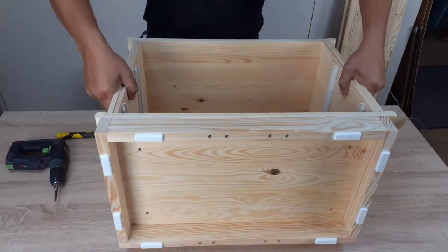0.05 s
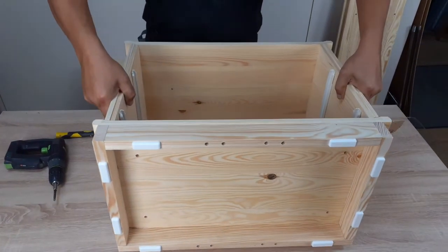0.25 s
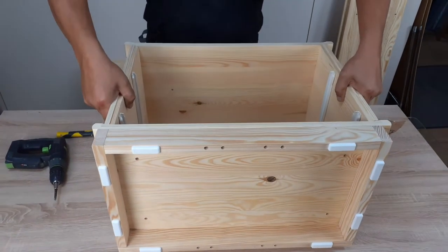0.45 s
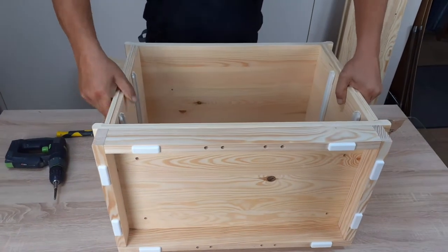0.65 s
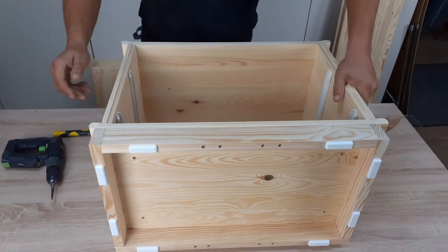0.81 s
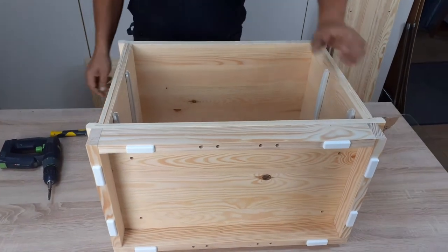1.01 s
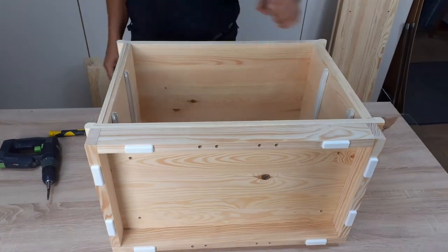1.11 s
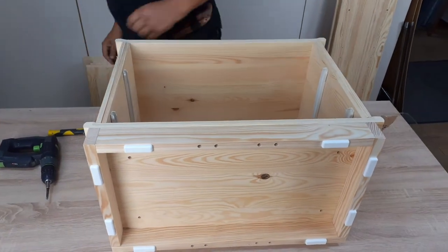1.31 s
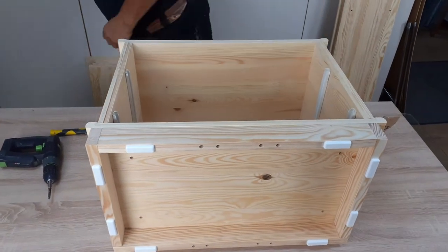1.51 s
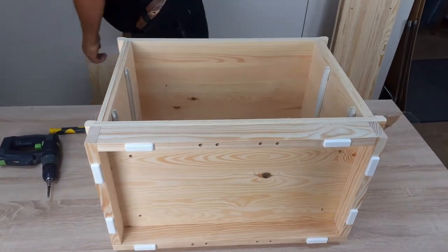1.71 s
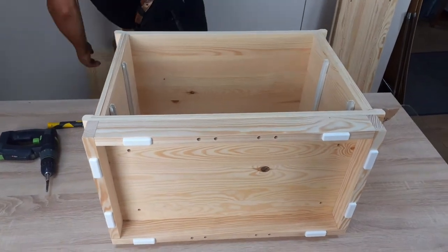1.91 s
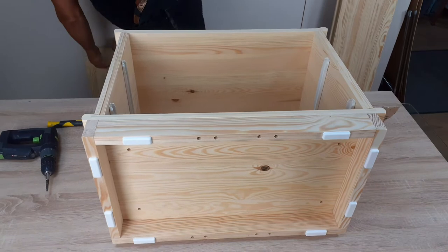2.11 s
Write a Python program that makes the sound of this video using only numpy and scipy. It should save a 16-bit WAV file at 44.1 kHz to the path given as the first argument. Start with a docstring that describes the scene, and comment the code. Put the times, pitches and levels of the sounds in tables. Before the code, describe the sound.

A hollow wooden cabinet lands on a table with clattering double knocks, then faint scrapes and bumps

```python
"""A pine cabinet is tipped onto a table in a small workshop, in still, faintly wavering air.
Hands brush the wood, as swelling and fading noise of tiny slips, from the start and well past the landing.
One edge lands and judders, then the other, and the box rocks to rest: blows ring modes and rattle boards.
Soft bumps knock behind the table now and then; late on something there, likely a loose board, scrapes twice
as filtered slip noise and settles with a low bump, a short force ringing a few decaying modes."""
import sys
import numpy as np
from scipy import signal
from scipy.fft import rfft, irfft
from scipy.io import wavfile

SR = 44100
rng = np.random.default_rng(int(sys.argv[2]) if len(sys.argv) > 2 else 0)


def generate_wav(sig):
    """Save sig (samples, or channels by samples) to the path in sys.argv[1] as 16-bit PCM at SR."""
    pcm = np.round(np.clip(np.atleast_2d(sig).T, -1, 1) * 32767).astype(np.int16)
    wavfile.write(sys.argv[1], SR, pcm)


N = 94815
FFT_SIZE = 131072

# All table levels are relative; the gains below and the colour of the ports act on top of them.
# Blows of the cabinet on the table: t/s, place (0 first edge, 1 second edge), boom level/dB,
# contact/ms (force peaks after a quarter of it), clack level/dB, clack tilt/(dB/octave), struck board f/Hz
BLOWS = [(0.2029, 0.0, -33.5, 0.61, -30, -2.5, 1300), (0.213, 0, -20.5, 1.67, -27.5, -6, 1300),
         (0.2173, 0.089, -13.5, 0.79, 1, -4.5, 1250), (0.2466, 0, -24, 1.1, -11.5, -14, 900),
         (0.273, 0.47, -14.5, 1.3, -12.5, -9.5, 1550), (0.375, 0.76, -7.5, 1.08, -0.5, 2, 1650),
         (0.3805, 0.99, 1.1, 2.03, 2.5, -1.5, 1200), (0.3992, 1.0, -9.5, 2, -3.5, 2, 1000),
         (0.4065, 0.37, -4, 2.8, -6.5, 0.5, 1000), (0.4509, 0.51, -9, 2.3, -6.5, -1, 1350),
         (0.458, 0.17, -5, 1.86, -13, 1.5, 1400), (0.4832, 0.95, -7, 3.6, -4, 2, 2110),
         (0.503, 0.96, -22.5, 1.6, -13, 0, 2300), (0.5498, 0.66, -14, 2.07, -22.5, -10, 904),
         (0.607, 0.0, -21, 0.97, -11, 0.5, 1100)]
# Modes of the box on the table: f/Hz, level/dB from the first edge, level/dB from the second edge, t60/s
BOX_MODES = [(74.6, -33, -17.5, 0.25), (118.5, -22.5, -13.5, 0.27), (125.07, -8, 4, 0.46),
             (167, 3.9, -9.5, 0.4), (209.6, -6.5, -3.5, 0.29), (256.0, -4.5, -29.5, 0.32),
             (285.9, -31.5, 2.24, 0.4), (317.98, 5.5, -17, 0.44), (347, -23, -11.5, 0.18),
             (371.6, -25.5, -15.5, 0.51), (429.4, -33, -22.5, 0.25), (525, -18, -30, 0.28),
             (650, -21, -36.5, 0.4), (848, -18.5, -31, 0.4)]
# Standing waves of the room: f/Hz, level/dB, t60/s
STANDING_WAVES = [(143, -36, 1.5), (308, -24, .7)]
# Colour of the dense upper modes of the boards: f/Hz, level/dB
CLACK_COLOUR = [(60, -18), (140, 2), (330, 7.5), (480, -10), (700, -4), (1100, -2.5), (1750, -11.5),
                (2300, -13.5), (3000, -28.5), (3600, -25), (4500, -31), (7000, -39), (15000, -48.5)]
# Strongest resonances of the boards: f/Hz, lift level/dB
BOARD_PEAKS = [(635, 0), (978, 5.5), (1077, 1), (1125, 4), (1255, 3.5), (1415, 8.5)]
# Colour of the juddering edge: f/Hz, level/dB
SKID_COLOUR = [(200, -23.5), (450, -5.5), (625, 7.5), (750, 3.5), (1200, -9.5), (1600, -4), (2000, -23),
               (5000, -39.5)]
# Hands and sleeves on the wood: t/s, attack/s, hold/s, release t60/s, level/dB, tilt/(dB/octave),
# pan/dB (left over right)
RUBS = [(0.0, 0.0013, 0.016, .25, -69.5, -6.5, -1.5), (0.174, 0.029, 0.012, 0.59, -54, -3, -1),
        (0.38, 0.0191, 0.06, 0.91, -53.5, -4, -0.5), (0.566, 0.0054, 0.04, 0.18, -63.5, 0.5, -0.5),
        (0.605, 0.00055, 0.0043, 0.16, -58.5, 6, -4), (0.61, 0.039, 0.03, 0.36, -57.5, 0, -1),
        (0.852, 0.019, 0.031, 0.71, -70.5, -0.2, 0.5), (1.13, 0.093, 0.014, 0.43, -71, -0.5, -2.5),
        (1.227, 0.027, 0.062, 0.49, -61.5, -1.5, 0), (1.326, 0.053, 0.079, 0.24, -67, -1.5, -1),
        (1.436, 0.045, 0.022, 1, -57.5, 0, 1.5)]
# Colour of skin and cloth on wood: f/Hz, level/dB
RUB_COLOUR = [(100, -33.5), (330, -8.5), (600, -6), (1500, 0.5), (2600, -3), (4000, -2), (5500, -7),
              (8000, -11), (15000, -20)]
# Wood dragged over wood: t/s, attack/s, hold/s, release t60/s, level/dB, body f/Hz, body lift level/dB,
# bass cut f/Hz, pan/dB (left over right)
SCRAPES = [(1.491, 0.072, 0.091, 0.63, -47.5, 1286, 4.5, 443, -1),
           (1.753, 0.074, 0.044, 0.45, -41.5, 756, 4.5, 119, 0.5)]
# Colour of wood on wood: f/Hz, level/dB
SCRAPE_COLOUR = [(60, -13), (160, -4.5), (450, -8), (750, -1.5), (1200, -0.5), (2000, 0), (3000, -5.5),
                 (4400, -7.5), (5800, -15.5), (8000, -20.5), (15000, -34)]
# Soft bumps behind the table: t/s, level/dB, contact/ms (force peaks after a quarter of it)
BUMPS = [(0.091, -19.5, 3.1), (0.921, -19.5, 1.5), (1.311, -24.5, 0.77), (1.38, -25.5, 0.64),
         (1.808, -7, 0.32), (1.884, 15, 8.2), (1.921, 5.5, 2.16), (1.953, 2, 1.23), (1.992, -6.5, 0.66),
         (2.033, -13, 1.1), (2.116, -17, 1.74)]
# Modes the bumps ring: f/Hz, level/dB, t60/s
THUD_MODES = [(70.6, -2.5, 0.35), (128.9, -8, .18), (142, -8.5, 0.18), (227, -3, .12), (331.3, -1, .16),
              (425.2, -4.5, 0.13)]
# Colour of the still air: f/Hz, level/dB
AIR_COLOUR = [(30, -31.5), (80, -12.5), (140, -2), (220, -6), (310, 4), (600, -17), (1500, -11),
              (4000, -21.5), (8000, -23), (15000, -22)]
# Reverberation of the workshop: f/Hz, t60/s
ROOM = [(100, .45), (330, .6), (1000, .48), (3000, .45)]
# Colour of the two microphone ports: f/Hz, left level/dB, right level/dB
PORTS = [(96, 5.5, 3.5), (393, 9, 8), (1270, 0.97, -1.4), (2478, 1, -1.5), (4600, -0.5, 0), (6200, -2, 0.5),
         (8500, -11.5, 4.5), (9886, -10.5, -5.5), (11600, -2.5, 0.5), (14500, 4.5, 0.5)]

BOX_DB, BOX_ROOM_DB, RADIATES_ABOVE_HZ = -16.5, -16, 140
RESTS_S, REST_LOSS_DB_PER_S = .555, 62  # extra damping of the box from here on
CLACK_DB, CLACK_T60_S, RATTLE_PER_S = 1, 0.031, 2500
CLACK_TAIL_DB, CLACK_TAIL_T60_S = 3, 0.26
CLACK_TILT_ABOVE_HZ, BOARD_WIDTH_HZ = 1000, 20
STRUCK_LIFT_DB, STRUCK_OCTAVES = 4.5, 0.27
SKID_S, SKID_LENGTH_S, SKID_DB, SKID_ROOM_DB = .238, .085, -45, 0.5
SKID_CATCH_HZ, SKID_JITTER = 169.4, .3  # median catch rate, spread of its natural logarithm
GRAIN_PER_S, GRAIN_DB, STROKE_WAVER_DB = 9000, -2, 0.5
# Each spot of wood favours its own resonances: spacing, spread under a blow, spread under a stroke
SPOT_SPACING_HZ, BLOW_SPOT_DB, STROKE_SPOT_DB = 50, 3, 2
SCRAPE_BODY_OCTAVES = 0.18
THUD_DB, THUD_ROOM_DB = -44.5, -9
AIR_DB, AIR_WAVER_DB = -75, .7
ROOM_BUILD_S, ALIKE_HZ = 0.0037, 560
PORT_LAG_S, TOP_HZ = .0001, 15700


def boom(room):
    """The hollow box rings in a mix of modes set by the place of each blow; standing waves outlast it."""
    forces = np.array([undb(db) * push(start, contact_ms) for start, _, db, contact_ms, *_ in BLOWS])
    place = np.clip([row[1] for row in BLOWS], 0, 1)
    first_edge = ring((1 - place) @ forces, [(hz, db, t60) for hz, db, _, t60 in BOX_MODES])
    second_edge = ring(place @ forces, [(hz, db, t60) for hz, _, db, t60 in BOX_MODES])
    resting_s = np.maximum(np.arange(N) / SR - RESTS_S, 0)
    box = (first_edge + second_edge) * undb(-REST_LOSS_DB_PER_S * resting_s)
    standing = ring(forces.sum(0), STANDING_WAVES)
    return undb(BOX_DB) * heard(box + standing, room, BOX_ROOM_DB)


def clack():
    """Each blow rattles the boards briefly, as random contacts, and leaves a diffuse tail in the room."""
    t, out = np.arange(N) / SR, 0
    peaks = sum(db / (1 + ((freqs() - hz) / BOARD_WIDTH_HZ) ** 2) for hz, db in BOARD_PEAKS)
    boards = curve(CLACK_COLOUR) + peaks
    for start, _, _, _, db, slope, ring_hz in BLOWS:
        since = t - start
        rattle = unit(slips(RATTLE_PER_S)[0] * (since >= 0) * fade(since, CLACK_T60_S))
        tail_shape = np.clip(since / ROOM_BUILD_S, 0, 1) * fade(since, CLACK_TAIL_T60_S)
        tail = unit(diffuse(rng.standard_normal((2, N))) * tail_shape)
        treble = tilt(slope) * (freqs() > CLACK_TILT_ABOVE_HZ)
        struck = STRUCK_LIFT_DB * hump(ring_hz, STRUCK_OCTAVES)
        spectrum_db = boards + treble + struck + spot(BLOW_SPOT_DB)
        out = out + undb(db) * colour(rattle + undb(CLACK_TAIL_DB) * tail, spectrum_db)
    return undb(CLACK_DB) * out / np.sqrt(2 * N)


def skid(room):
    """The first edge judders over the table while the box tips: uneven catches clatter in the boards."""
    u = (np.arange(N) / SR - SKID_S) / SKID_LENGTH_S
    catch_rate = SKID_CATCH_HZ * np.exp(SKID_JITTER * waver(count=400))
    turns = np.floor(np.cumsum(catch_rate) / SR)
    swell = np.sqrt(np.clip(4 * u * (1 - u), 0, 1))
    catches = np.diff(turns, prepend=0) * swell  # one click per completed turn
    clatter = unit(colour(catches, curve(SKID_COLOUR))) * np.sqrt(SKID_LENGTH_S * SR / N)
    return undb(SKID_DB) * heard(clatter, room, SKID_ROOM_DB)


def hands():
    """Skin and cloth brush over the planed pine: friction noise tilted stroke by stroke."""
    return sum(undb(db) * friction(start, attack, hold, release, curve(RUB_COLOUR) + tilt(slope), pan)
               for start, attack, hold, release, db, slope, pan in RUBS)


def scrapes():
    """Two wooden scrapes: friction noise with a broad body resonance and a bass cut."""
    out = 0
    for start, attack, hold, release, db, body_hz, lift_db, cut_hz, pan in SCRAPES:
        body = lift_db * hump(body_hz, SCRAPE_BODY_OCTAVES)
        bass_cut = -10 * np.log10(1 + (cut_hz / np.maximum(freqs(), 20)) ** 4)
        spectrum_db = curve(SCRAPE_COLOUR) + body + bass_cut
        out = out + undb(db) * friction(start, attack, hold, release, spectrum_db, pan)
    return out


def bumps(room):
    """Dull, soft knocks behind the table: short forces ring a few decaying modes."""
    force = sum(undb(db) * push(start, contact_ms) for start, db, contact_ms in BUMPS)
    return undb(THUD_DB) * heard(ring(force, THUD_MODES), room, THUD_ROOM_DB)


def air():
    """Faint diffuse room noise that wavers slowly in level."""
    noise = unit(colour(diffuse(rng.standard_normal((2, N))), curve(AIR_COLOUR)))
    return noise * undb(AIR_DB + AIR_WAVER_DB * waver(count=20))


def workshop():
    """Response of the room: diffuse echoes that build quickly and die at a rate set by frequency."""
    t, out = np.arange(N) / SR, 0
    noise = rfft(diffuse(rng.standard_normal((2, N))), FFT_SIZE)
    for k, (_, t60) in enumerate(ROOM):
        # each band cross-fades into its neighbours
        share = curve([(row[0], j == k) for j, row in enumerate(ROOM)])
        out = out + irfft(noise * share)[:, :N] * fade(t, t60)
    return unit(out * (1 - np.exp(-t / ROOM_BUILD_S))) / np.sqrt(N)


def heard(x, room, room_db):
    """Direct sound, reaching the left port first, mixed with the room at constant power."""
    late = np.interp(np.arange(N) - round(PORT_LAG_S * SR), np.arange(N), x, left=0)
    mix = np.array([x, late]) + undb(room_db) * convolve(x, room)
    return mix / np.hypot(1, undb(room_db))


def push(start, contact_ms):
    """Force of one contact, of unit area: the longer it lasts, the duller the blow."""
    u = np.maximum(np.arange(N) / SR - start, 0) / (max(contact_ms, .1) / 4000)
    force = u * np.exp(-u)
    return force / (force.sum() + 1e-12)


def ring(force, modes):
    """Decaying sine modes driven by a force; the deep bass hardly radiates."""
    t = np.arange(N) / SR
    body = sum(undb(db) * np.sin(2 * np.pi * hz * t) * fade(t, t60) for hz, db, t60 in modes)
    radiation = signal.butter(2, RADIATES_ABOVE_HZ, "high", fs=SR, output="sos")
    return signal.sosfilt(radiation, convolve(force, body))


def friction(start, attack, hold, release, spectrum_db, pan_db):
    """One stroke, heard from all sides: tiny slips that swell, hold and die away."""
    t = np.arange(N) / SR - start
    envelope = np.clip(t / max(attack, 1e-3), 0, 1) * fade(t - attack - hold, release)
    pressure = envelope * undb(STROKE_WAVER_DB * waver(count=130))
    grain = unit(colour(diffuse(slips(GRAIN_PER_S)), spectrum_db + spot(STROKE_SPOT_DB)))
    return grain * pressure * undb(np.array([[pan_db], [-pan_db]]) / 2)


def slips(rate):
    """Two trains of tiny random contacts of uneven size."""
    size = rng.standard_normal((2, N)) * undb(GRAIN_DB * rng.standard_normal((2, N)))
    return unit((rng.random((2, N)) < rate / SR) * size)


def diffuse(pair):
    """Two noises as sound from all sides: alike at both ports in the bass, unrelated in the treble."""
    alike = 1 / (1 + (freqs() / ALIKE_HZ) ** 4)
    mid, side = rfft(pair, FFT_SIZE) * np.sqrt([(1 + alike) / 2, (1 - alike) / 2])
    return irfft(np.array([mid + side, mid - side]))[:, :N]


def spot(depth_db):
    """Uneven colour of one place of contact, in dB per bin, at constant power."""
    points = np.arange(0, SR / 2, SPOT_SPACING_HZ)
    db = depth_db * np.interp(freqs(), points, rng.standard_normal(len(points)))
    return db - 10 * np.log10(np.mean(undb(db) ** 2))


def hump(hz, octaves):
    """A bell of height 1 on a log-frequency axis."""
    return np.exp(-.5 * (np.log2(freqs() / hz) / octaves) ** 2)


def tilt(slope):
    """A slope in dB per octave through 1 kHz, flat in the bass."""
    return slope * np.log2(np.maximum(freqs(), 400) / 1000)


def waver(count):
    """Random wander of spread near 1 through count points."""
    return np.interp(np.arange(N), np.linspace(0, N, count), rng.standard_normal(count))


def fade(t, t60):
    """Exponential decay by 60 dB in t60 seconds, held at 1 before time zero."""
    return np.exp(-np.log(1000) * np.maximum(t, 0) / max(t60, 1e-3))


def colour(x, db):
    """Causal minimum-phase filter with the given gain per bin."""
    cepstrum = irfft(np.log(undb(db)))
    # fold the mirrored half forward so that nothing sounds early
    cepstrum[1:FFT_SIZE // 2] *= 2
    cepstrum[FFT_SIZE // 2 + 1:] = 0
    return irfft(rfft(x, FFT_SIZE) * np.exp(rfft(cepstrum)))[..., :N]


def convolve(a, b):
    """Pass a sound through a response."""
    return irfft(rfft(a, FFT_SIZE) * rfft(b, FFT_SIZE))[..., :N]


def curve(points, column=1):
    """Read a table on a log-frequency axis."""
    p = np.array(points, float)
    return np.interp(np.log(freqs()), np.log(p[:, 0]), p[:, column])


def freqs():
    """Frequency of every spectral bin in Hz, at least 1."""
    return np.maximum(np.arange(FFT_SIZE // 2 + 1) * SR / FFT_SIZE, 1)


def undb(db):
    """Decibels to gain."""
    return 10 ** (np.asarray(db) / 20)


def unit(x):
    """Scale to rms 1."""
    return x / np.sqrt(np.mean(x ** 2))


def scene():
    """All sources in the one room."""
    room = workshop()
    cabinet = boom(room) + clack() + skid(room)
    return cabinet + hands() + scrapes() + bumps(room) + air()


def record(dry):
    """Each port colours the sound in its own way; the top is cut."""
    ports = np.array([colour(x, curve(PORTS, k + 1)) for k, x in enumerate(dry)])
    top_cut = signal.ellip(10, .2, 70, TOP_HZ, fs=SR, output="sos")
    return signal.sosfilt(top_cut, ports)


dry = scene()
out = record(dry)
generate_wav(out)
```